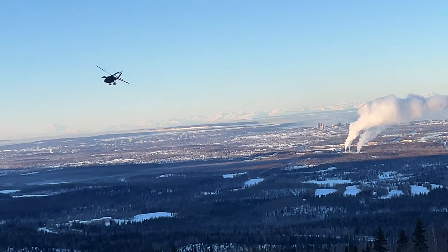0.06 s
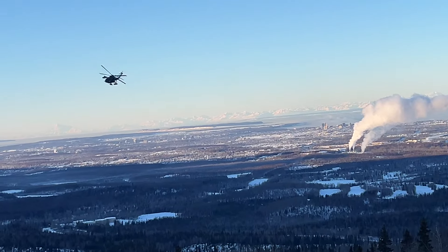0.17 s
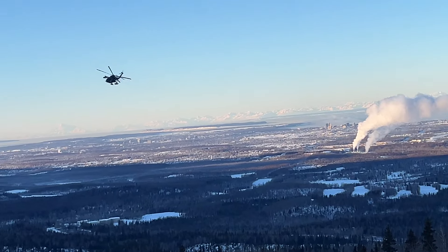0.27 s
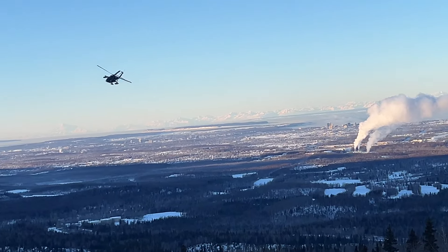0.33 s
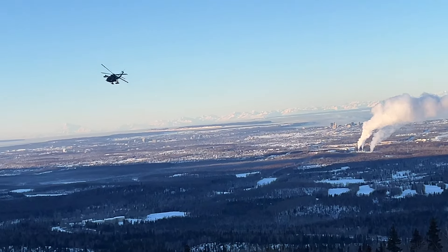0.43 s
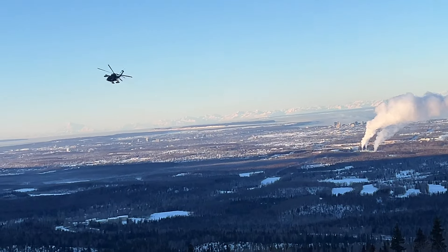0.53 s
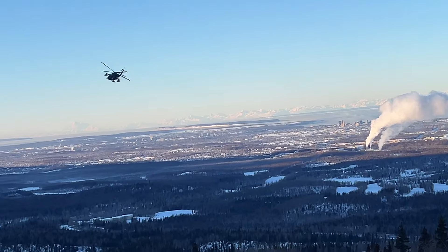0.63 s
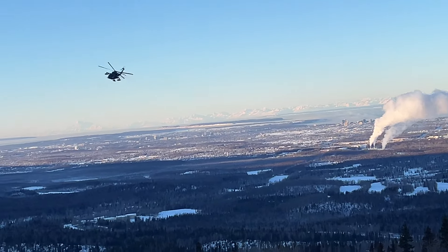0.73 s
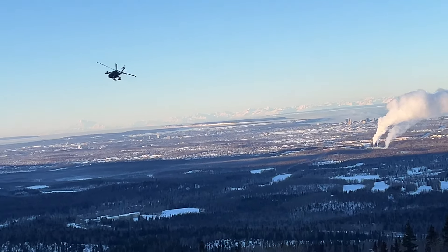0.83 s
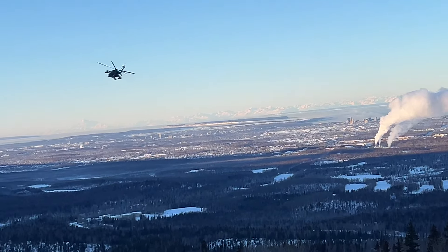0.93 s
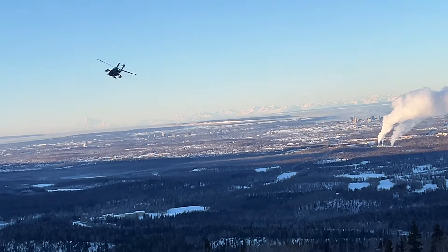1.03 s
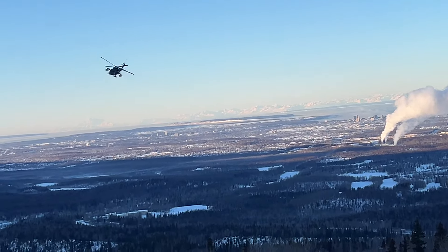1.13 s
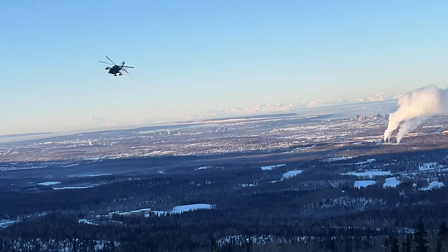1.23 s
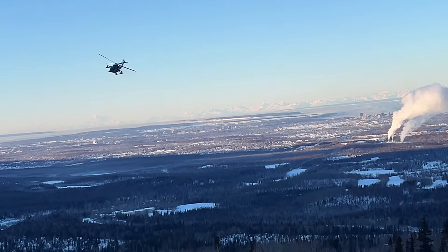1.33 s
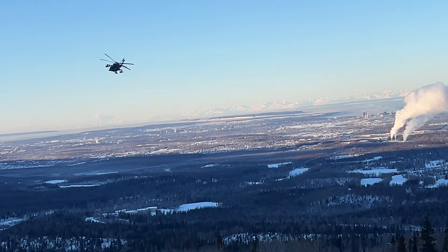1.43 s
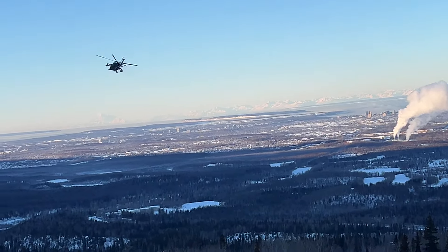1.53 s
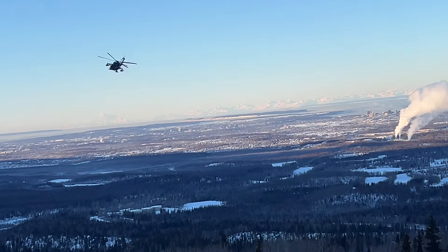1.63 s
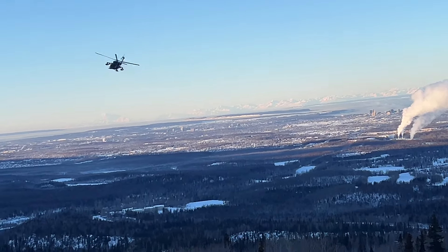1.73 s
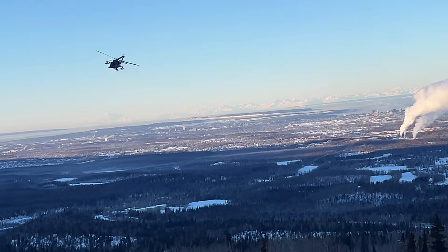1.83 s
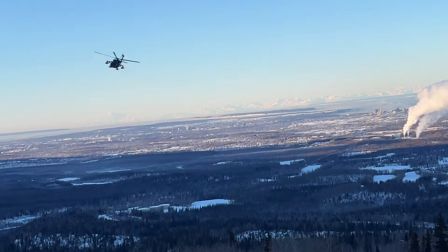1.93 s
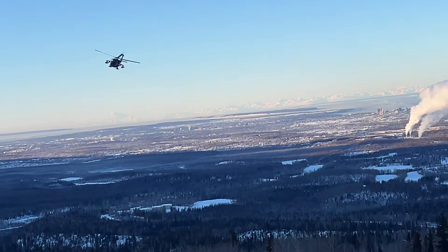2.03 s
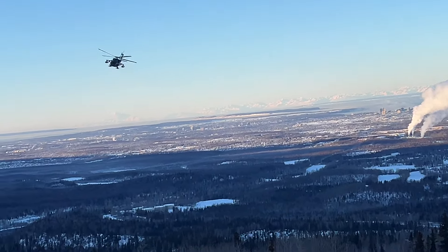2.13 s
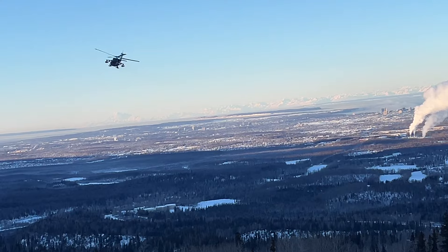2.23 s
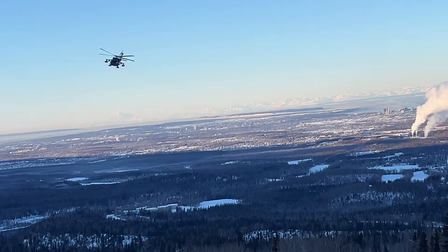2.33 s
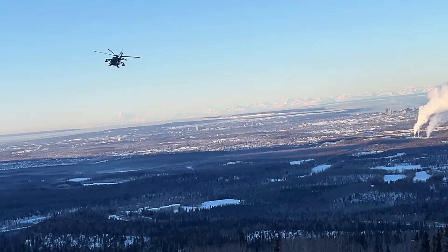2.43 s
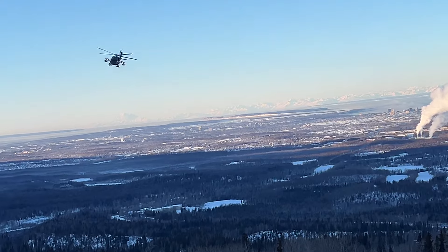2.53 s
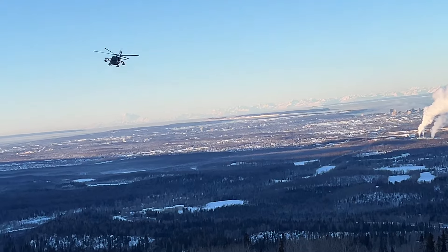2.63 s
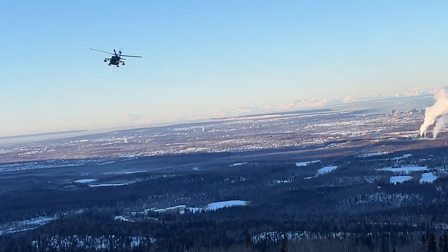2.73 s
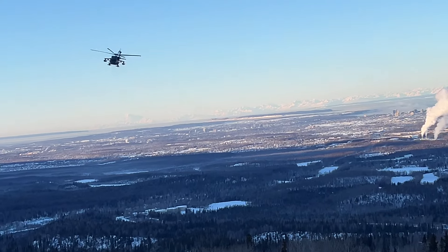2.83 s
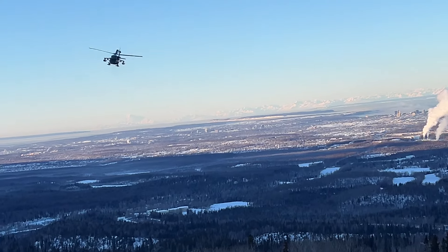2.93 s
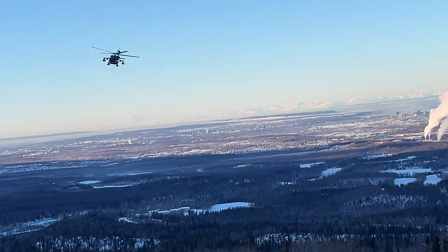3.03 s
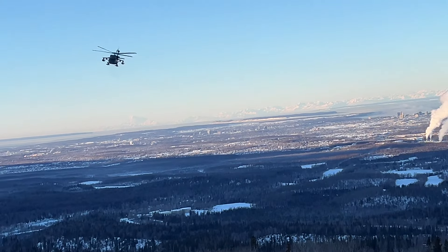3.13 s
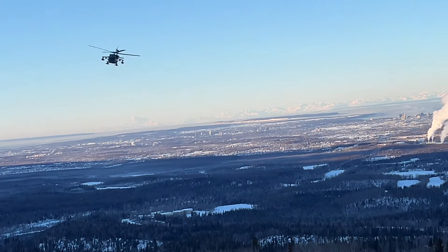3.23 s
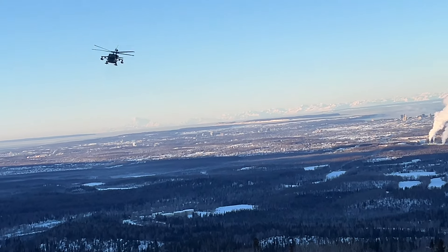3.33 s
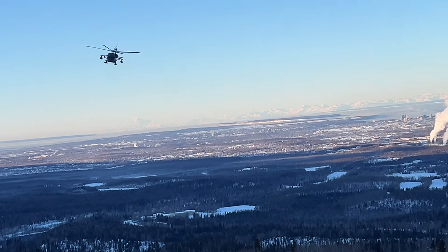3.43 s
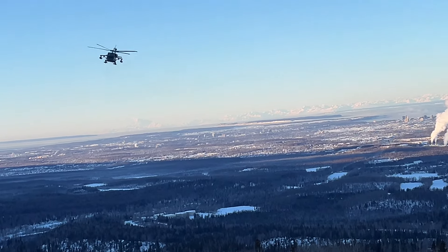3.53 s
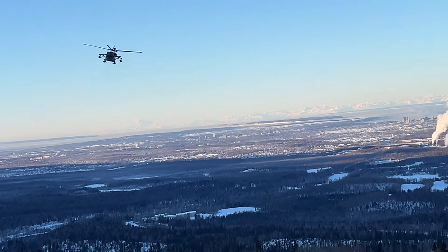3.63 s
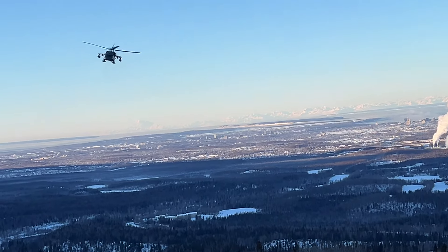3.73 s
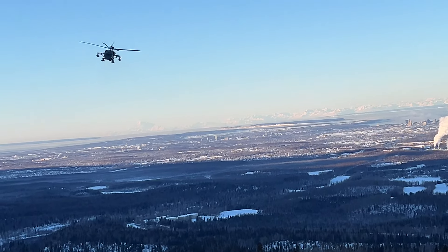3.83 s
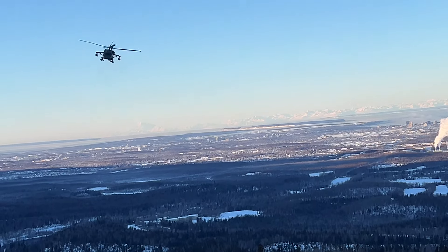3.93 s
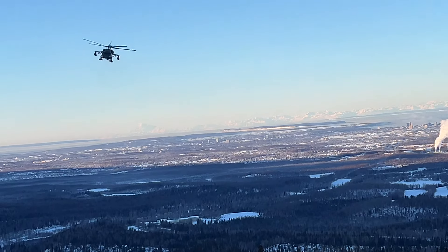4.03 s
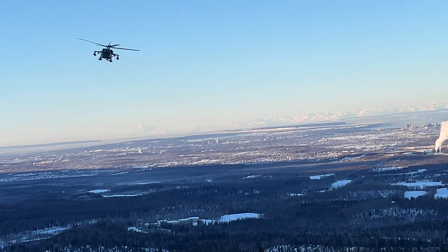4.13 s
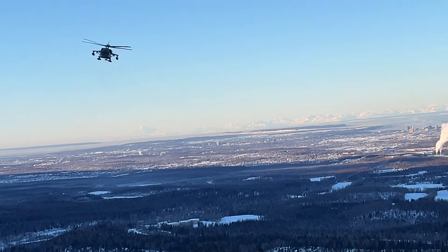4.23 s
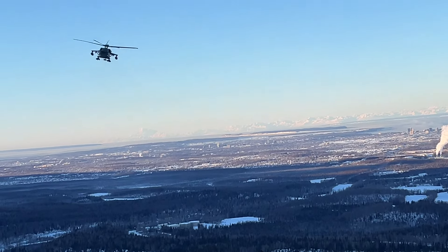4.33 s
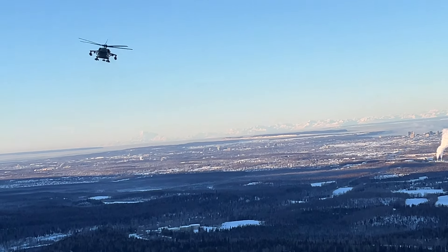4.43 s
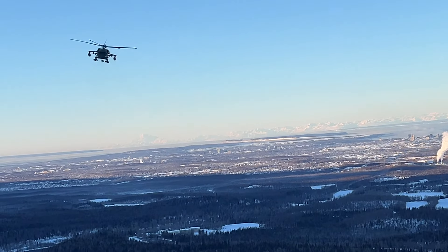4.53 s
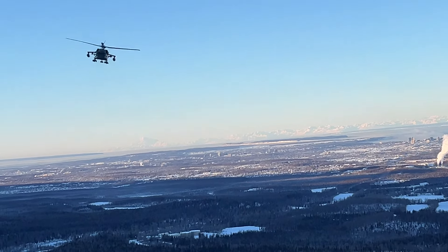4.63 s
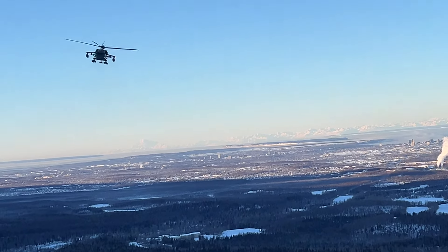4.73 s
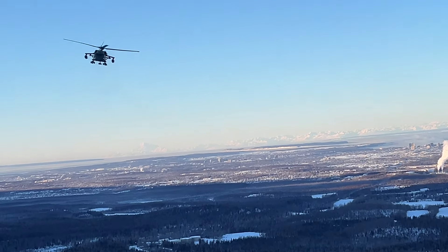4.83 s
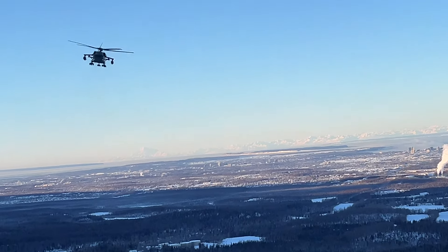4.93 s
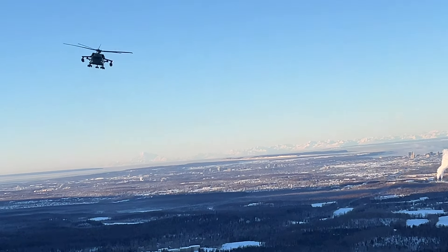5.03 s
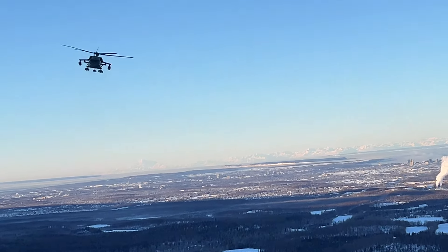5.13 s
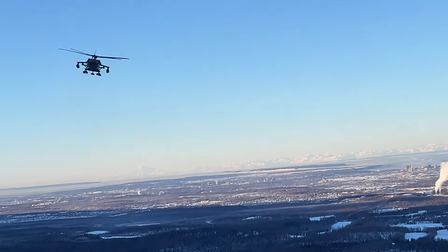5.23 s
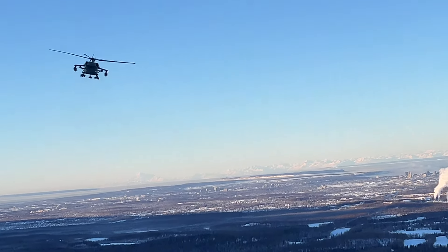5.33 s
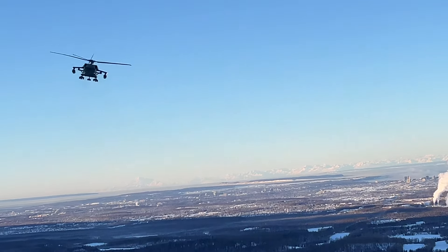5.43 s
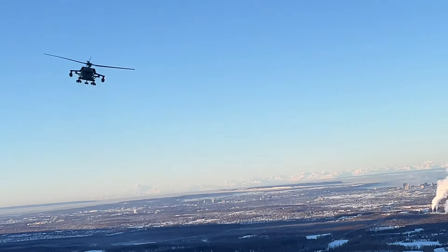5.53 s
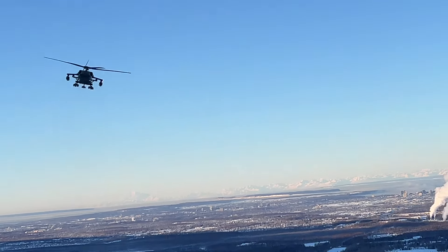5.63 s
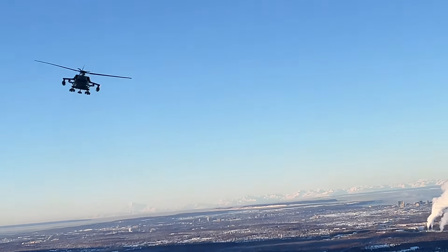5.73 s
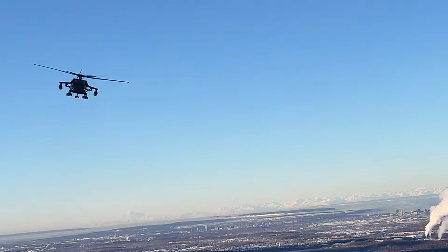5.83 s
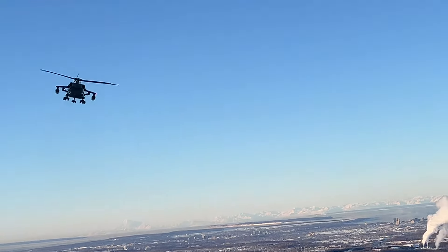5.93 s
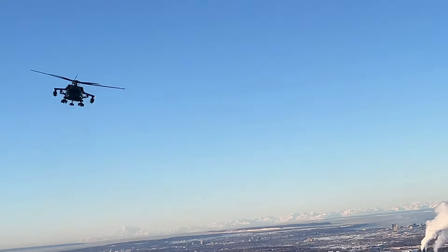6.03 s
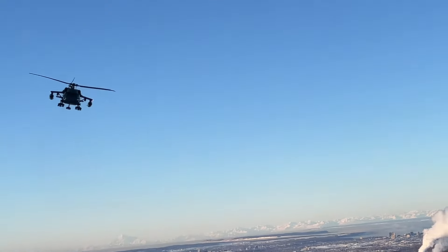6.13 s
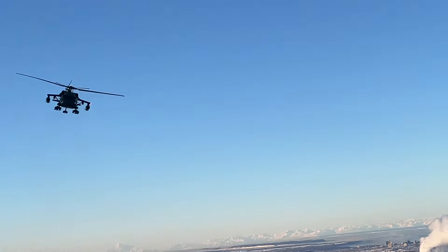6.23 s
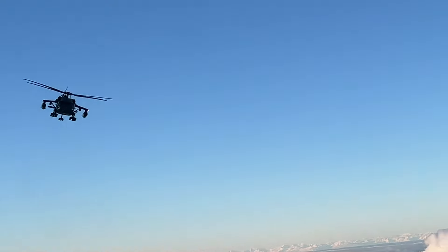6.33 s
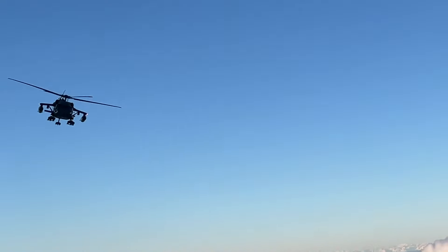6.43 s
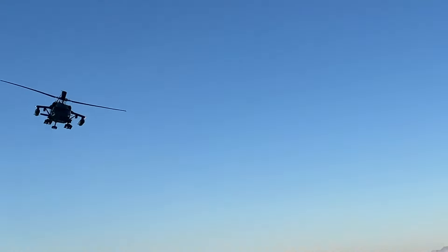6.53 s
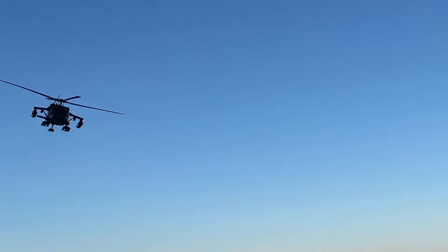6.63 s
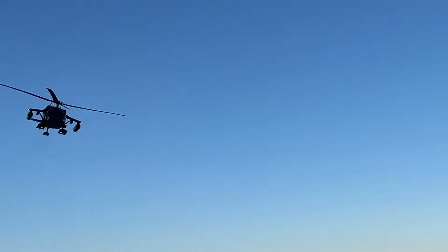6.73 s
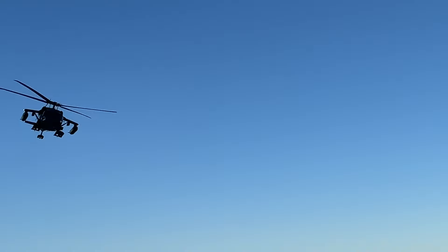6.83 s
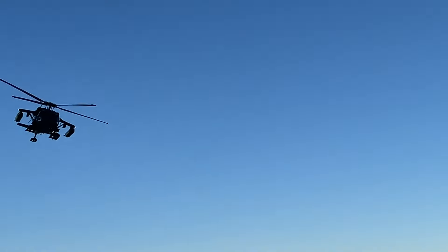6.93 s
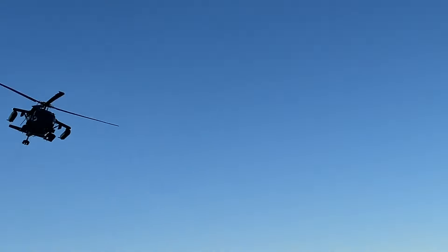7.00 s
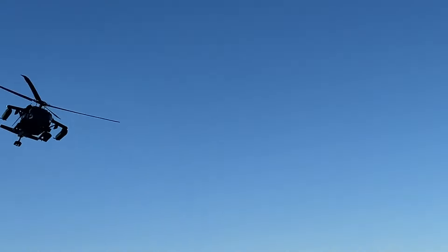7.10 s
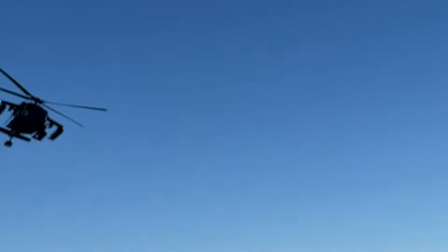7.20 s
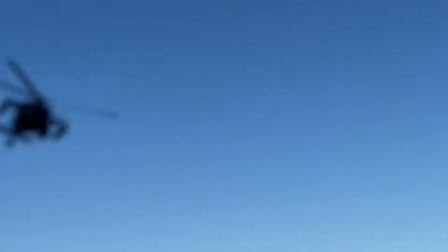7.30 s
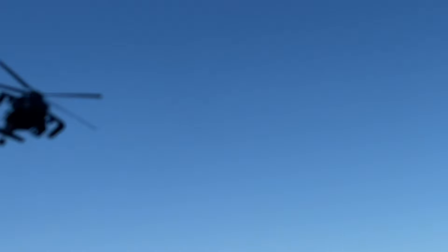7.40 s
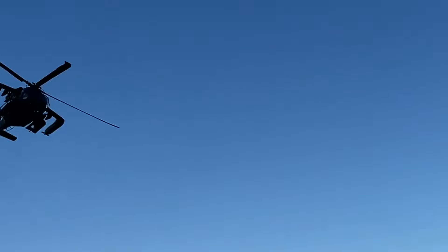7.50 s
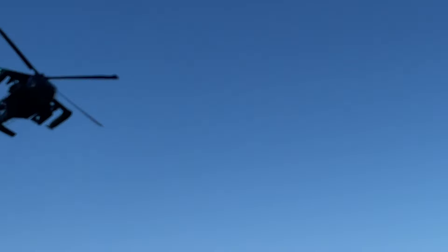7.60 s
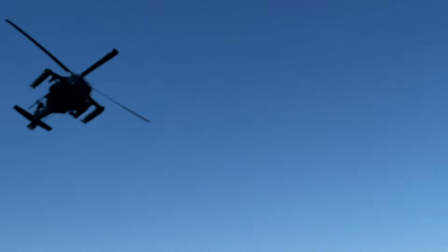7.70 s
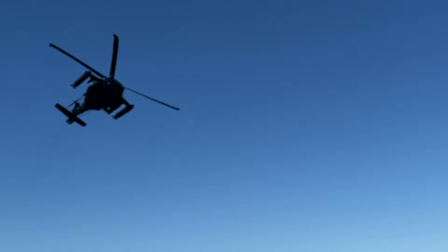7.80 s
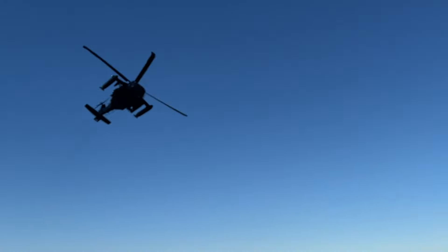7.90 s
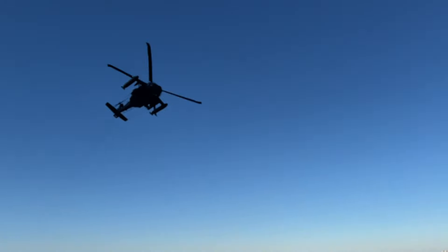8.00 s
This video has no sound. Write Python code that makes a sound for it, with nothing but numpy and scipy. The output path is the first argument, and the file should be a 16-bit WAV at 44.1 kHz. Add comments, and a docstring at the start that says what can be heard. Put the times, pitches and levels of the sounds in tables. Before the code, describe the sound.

A single helicopter approaches over open country for about eight seconds, with no echo. From the start, its distant tail rotor makes a throbbing, raspy buzz that wavers over a soft rush of air. Around 2 seconds a thin, high gear whine appears, followed by a few light blade slaps. By 3 seconds the main rotor's deep, fast thump takes over, about twenty beats a second, each with a swish, and the buzz fades back. A duller slap lands near 3.2 seconds and another near 6.1. The whine and a very high turbine tone swell and fade between 3 and 6 seconds. From 6 seconds, roaring air and pulsing hiss grow louder and a rounder drone rises. The helicopter passes close overhead at about 7.5 seconds, its pitch dipping slightly, with a rapid run of sharp, crackling slaps from 7.7 seconds to the end, still loud.

```python
"""Open snowy country: a helicopter approaches and passes close overhead.
Far off, the tail rotor's quick pressure pulses buzz; then the main rotor's chirped thump takes over,
each blade with a tip swish ahead of it. Turbulent wash, gear whine and turbine hiss swell as it nears.
Blades cutting tip vortices slap and crackle, mostly overhead."""
import sys
import numpy as np
from scipy import signal
from scipy.fft import rfft, irfft, next_fast_len
from scipy.io import wavfile
from scipy.ndimage import uniform_filter1d

SR = 44100
rng = np.random.default_rng(int(sys.argv[2]) if len(sys.argv) > 2 else 0)


def store_wav(level_fs):
    """Save 16-bit WAV to argv[1]."""
    pcm = np.round(np.clip(np.atleast_2d(level_fs), -1, 1) * 32767)
    wavfile.write(sys.argv[1], SR, pcm.T.astype(np.int16))


N = 355446
N_FFT = next_fast_len(N, True)
T_S = np.arange(N) / SR
F_HZ = np.maximum(np.fft.rfftfreq(N_FFT, 1 / SR), 1)
PASS_S, SPEED_M_PER_S, CLOSEST_M = 7.57, 71, 71.4  # straight, even flight
GEAR_RATIO, MAIN_LEAD_S = 4.607, .13  # tail passages per main passage; main rotor flies by earlier

# Main rotor, thrown forward as the nose swings to the listener: t/s, thump/dB, knock/dB
MAIN_LEVELS = [(0, -42, -32), (.9, -38.5, -30), (2, -26, -38.5), (3, -19.5, -24), (4.35, -17.5, -21),
               (5, -16.5, -18.5), (6.3, -14, -16), (7.3, -15.5, -14), (8.06, -18.5, -16)]
# Main rotor pulse spectrum: harmonic, level/dB
MAIN_SPECTRUM = [(1, -22), (2, -5), (3, 8), (4, 8.5), (5, 4.5), (7, 4), (8, 2.5), (10, -4), (13, -7.5),
                 (18, -13), (24, -24.5), (45, -45), (110, -38.5)]
# Main blade swish: t/s, level/dB
SWISH_LEVEL = [(0, -48), (.6, -48.5), (1.4, -38.5), (2, -43), (2.6, -47.5), (3.05, -36.5), (3.8, -43),
               (4.6, -35.5), (5.3, -43), (5.75, -35), (6.2, -35), (6.85, -25.5), (7.15, -30.5), (7.45, -29),
               (8.06, -23.5)]
# Single harder swishes: t/s, boost/dB
SWISH_ACCENTS = [(.886, 5), (1.04, 6), (2.961, 6), (3.162, 6), (3.51, 6), (3.56, 6), (6.39, 3), (6.887, 2),
                 (6.935, 2), (7.38, 4), (7.48, 4)]
# Blade-vortex hits: t/s, peak/dB, brightness/Hz
VORTEX_HITS = [(2.2100, -20, 900), (2.3185, -15, 1200), (2.4735, -22, 900), (2.5170, -22, 900),
               (3.2075, -10.5, 480), (6.1235, -8, 370), (7.1300, -15, 500), (7.1590, -12, 600),
               (7.7295, -15, 800), (7.7770, -9, 650), (7.8283, -5, 1150), (7.8792, -8, 700),
               (7.9295, -7.5, 650), (7.9808, -7.5, 3000), (8.0325, -14, 2500)]

# Tail rotor, loud in its disc plane (far off, again overhead): t/s, hum/dB, drone/dB, buzz/dB, rasp/dB
TAIL_LEVELS = [(0, -20.5, -37.5, -33, -28.5), (.45, -21.5, -34, -30, -31.5), (.7, -24, -31.5, -28.5, -33.5),
               (1.05, -24, -31, -30, -31.5), (1.5, -22.5, -29, -30.5, -41), (2.55, -26.5, -28.5, -30, -38),
               (3.6, -36, -33, -33.5, -44), (4.4, -59, -37, -41, -55), (5.6, -33, -41.5, -55, -46.5),
               (6.85, -29.5, -31, -51, -49), (7.3, -33, -28.5, -37, -36), (7.54, -28, -20.5, -33, -36.5),
               (7.76, -18.5, -25.5, -51, -46), (8.06, -20, -32, -46, -65)]
# Tail blade passage rate, Doppler included: t/s, f/Hz
TAIL_BLADE_RATE = [(0, 89.48), (1, 90.33), (1.9, 90.5), (2.6, 91.6), (3.5, 92.43), (6, 92.82), (6.5, 93.41),
                   (7, 93.4), (7.5, 92.55), (8.2, 90.8)]
# Four unequal tail blades, in passing order: offset/dB
TAIL_IMBALANCE = [2.6, -2.2, .1, -1.3]
# Tail throb: t/s, share of imbalance, swing from main rotor wake/dB
THROB_DEPTH = [(0, .6, .3), (.9, 1, 1.2), (1.6, 1, 2), (2.5, .7, 2), (3.4, .4, 1.4), (7, .3, 0)]
# Tail pulse spectrum from ahead: harmonic, level/dB
TAIL_AHEAD_SPECTRUM = [(1, -2.5), (2, 3), (3, 0), (4, -5), (5, -0.5), (6, -0.5), (7, -2), (9, -10),
                       (16, -11.5), (20, -17), (28, -48), (40, -49.5), (70, -61)]
# Tail pulse spectrum from below: harmonic, level/dB
TAIL_BELOW_SPECTRUM = [(1, 0.5), (2, 2), (3, 5), (4, -12), (5, -11), (6, -13), (7, -26), (9, -12),
                       (16, -13), (26, -37), (70, -50)]
# View of the tail rotor: t/s, share heard from below
BELOW_SHARE = [(0, 0), (4, 0), (6, .8), (7, 1), (8.06, 1)]
# Sharp top of the tail pulses, beamed in the disc plane: t/s, level/dB
CRACK_LEVEL = [(0, -31), (.09, -35), (.16, -43.5), (.42, -45), (.55, -55), (1.1, -53.5), (1.5, -53.5),
               (6.7, -57), (7.15, -38.5), (7.4, -39), (7.6, -35), (7.76, -39)]
# Spectrum of that top: harmonic, level/dB
CRACK_SPECTRUM = [(20, 7), (27, 11.5), (35, 9), (44, -2.5), (60, -2.5), (104, -11.5)]
# Stray paths through uneven air: lag/s, wander/s, level/dB
AIR_PATHS = [(.0007, .0002, -13.5), (.0028, .0004, -17.5)]

# Wash and hiss spectrum: f/Hz, density/dB
WASH_SPECTRUM = [(20, 40), (60, -4), (190, 2), (350, 8.5), (600, 6), (900, -3.5), (1500, -6.5),
                 (2000, -6.5), (2400, -8), (2900, -9), (4000, -18), (5200, -19.5), (6500, -17.5),
                 (8200, -20), (10000, -29.5), (12500, -30.5), (15000, -21.5)]
# Stereo width of wash and hiss: f/Hz, side minus mid/dB
WASH_WIDTH = [(60, -11), (250, -19.5), (600, -16.5), (1500, -16), (2400, -17.5), (3300, -12), (4500, -50),
              (8000, -56), (10500, -29), (15000, -23)]
# Far wash, lows: t/s, level/dB
FAR_RUMBLE_LEVEL = [(0, -30.5), (2, -31), (3.2, -29), (5, -31), (6.5, -21.5)]
# Far wash, midrange: t/s, level/dB
FAR_RUSH_LEVEL = [(0, -32.5), (1, -33), (1.6, -36), (2.6, -33.5), (3.6, -32.5), (4.6, -36), (6.6, -38)]
# Treble, swelling and fading through the air: t/s, level/dB
HISS_LEVEL = [(0, -59), (.85, -49.5), (1.5, -57), (1.95, -49), (2.8, -46.5), (3.15, -50), (3.4, -39.5),
              (3.65, -49.5), (4.25, -50), (4.6, -42.5), (4.8, -47), (5.55, -46), (6.25, -44), (6.77, -40),
              (7.1, -36.5), (7.4, -35.5), (7.56, -36), (8.0, -30.5)]
# Hiss surge per blade, under the disc: t/s, swing/dB
HISS_SURGE = [(7.1, 0), (7.45, 2), (8.06, 2.4)]

# Gear tones from ahead: f/Hz, level/dB, width/Hz
NOSE_GEARS = [(3020, -73, 44), (3920, -68, 18), (5470, -65, 40), (6300, -74.5, 40), (7031, -67, 34),
              (8600, -62.5, 75), (9390, -66, 70)]
# Gear tones from below: f/Hz, level/dB
BELLY_GEARS = [(1577, -47), (2320, -49), (2972, -53.5)]
# Whine beamed forward: t/s, nose gears/dB, intake/dB
WHINE_LEVELS = [(0, -11, -53), (1.5, -9, -65.5), (2, 5, -55.5), (3.15, 3, -47), (3.4, 10, -51),
                (3.7, 3.5, -50.5), (4.8, 9, -68), (5.15, 8.5, -59), (5.42, 12, -45.5), (5.72, 7, -43.5),
                (5.95, 1, -52), (7.1, -8, -60)]
# Turbine compressor pitch: t/s, f/Hz
COMPRESSOR_PITCH = [(0, 15100), (1, 15150), (2.5, 15520), (4.5, 15640), (6, 15580), (6.6, 15420),
                    (7, 15280), (8.06, 15300)]
# Compressor beam sweeping past: t/s, top hiss/dB, compressor/dB
BEAM_LEVELS = [(0, -52, -62), (.5, -68, -68), (1.6, -73, -61), (1.9, -63, -56), (2.6, -54, -65),
               (2.78, -47.5, -49), (3.35, -50, -47), (3.7, -48.5, -46), (4.25, -46, -46), (4.57, -44, -31),
               (4.75, -47.5, -41), (5.6, -42, -38), (6.25, -42.5, -40), (6.5, -41, -38), (6.75, -31, -25),
               (7.12, -38, -30), (7.33, -26, -27.5), (7.58, -35.5, -38), (7.75, -29, -31), (8.06, -28, -50)]

# Left-right balance: f/Hz, left minus right/dB
STEREO_BALANCE = [(60, -.2), (380, -.4), (700, .3), (1290, 1), (2380, .1), (4400, .7), (8000, 0)]
# Left-right phase; the left ear lags in the top treble, widening the hiss: f/Hz, left lead/rad
STEREO_PHASE = [(0, 0), (2000, 0), (3150, .55), (4300, .15), (8500, 0), (9100, -1.57), (10230, -3.14),
                (11300, -4.71), (12050, -6.28), (15550, -12.57)]


def main_rotor(passages, rate_hz):
    """One pressure pulse per blade: steady thump and knock, less steady edge and snap."""
    thump_db, knock_db = curves(MAIN_LEVELS)
    thump, knock, edge, snap = (pulse_train(passages, rate_hz, MAIN_SPECTRUM, range(*span), thump_rad)
                                for span in [(1, 6), (6, 12), (12, 25), (25, 110)])
    body = (from_db(thump_db) * thump + from_db(knock_db) * knock) * per_blade(passages, spread_db=.5)
    edge = from_db(swell_db(-23, growth=.99)) * edge
    snap = from_db(swell_db(-36.5, growth=.92)) * snap * per_blade(passages, spread_db=2)
    return body + (edge + snap) * per_blade(passages, spread_db=2)


def chirp_rad(hz, lag_cycles=1.495, pivot_hz=101.7):
    """Falling chirp: every frequency lags by the same number of cycles."""
    return -2 * np.pi * lag_cycles * np.log(hz / pivot_hz)


def thump_rad(hz, centre_hz=130):
    """Main rotor chirp; its deepest part lags less."""
    return chirp_rad(hz) + .6 - 1.4 * np.log(np.minimum(hz, 2 * centre_hz) / centre_hz) ** 2


def blade_swish(passages):
    """Hiss burst from each advancing tip, wandering between dull and bright."""
    swish_db, = curves(SWISH_LEVEL)
    swish_db += sum(db * np.exp(-((T_S - at_s) / .02) ** 2) for at_s, db in SWISH_ACCENTS)
    tilt_db = 2.5 * drift(2)
    dull = from_db(-2.5 - tilt_db) * air_noise(2340, 3070)
    bright = from_db(-5 + tilt_db) * air_noise(3080, 4470)
    return from_db(swish_db) * swish_gate(passages) * (dull + bright)


def swish_gate(passages):
    """Quick rise, slower fall, once per main blade."""
    return blade_gate(passages, crest=.065, rise=.035, fall=.08) * per_blade(passages, spread_db=1.1)


def vortex_slaps(body_hz=220, burst_db=-11, decay_s=.0028):
    """Blade cuts a tip vortex: chirped pulse plus a short burst of torn air."""
    out = np.zeros(N)
    chirp = highpass(body_hz, order=2) * np.exp(1j * chirp_rad(F_HZ))
    for at_s, peak_db, bright_hz in VORTEX_HITS:
        age_s = np.maximum(T_S - at_s, 0)
        envelope = (age_s > 0) * np.exp(-np.minimum(age_s / decay_s, 20))
        source = from_db(burst_db) * rng.standard_normal(N) * envelope
        source[round(at_s * SR)] += 4
        colour = lowpass(bright_hz, order=2) * lowpass(4 * bright_hz, order=2)
        pulse = filtered(source, colour * chirp)
        out += from_db(peak_db) * pulse / np.abs(pulse).max()
    return out


def tail_rotor(passages, rate_hz, main_passages):
    """Quick, sharp, unequal pulses, shaken by the air; a rounder drone from below."""
    hum_db, drone_db, buzz_db, rasp_db = curves(TAIL_LEVELS)
    below, = curves(BELOW_SHARE)
    crack_db, = curves(CRACK_LEVEL)
    load_db = tail_load_db(passages, main_passages)
    passages = passages + .009 * (1 - .85 * below) * drift(14)  # timing jitter from uneven air
    hum, drone, buzz, rasp = (
        (1 - below) * pulse_train(passages, rate_hz, TAIL_AHEAD_SPECTRUM, range(*span))
        + below * pulse_train(passages, rate_hz, TAIL_BELOW_SPECTRUM, range(*span))
        for span in [(1, 4), (4, 6), (6, 9), (9, 26)])
    crack, tick = (pulse_train(passages, rate_hz, CRACK_SPECTRUM, range(*span))
                   for span in [(21, 45), (45, 105)])
    low = from_db(swell_db(-17, growth=1.78, far_db=hum_db) - 2.5) * hum
    middle = from_db(drone_db) * drone + from_db(buzz_db) * buzz
    middle *= from_db(.6 * load_db + 1.6 * (1 - below) * drift(12))
    top = from_db(rasp_db + 3) * rasp + from_db(crack_db) * crack
    top += from_db(27.5 + 2.055 * crack_db) * tick
    top *= from_db(load_db) * per_blade(passages, spread_db=1.4)
    return through_air(low + middle + top)


def tail_load_db(passages, main_passages, wake_passage=.16):
    """Tail blades differ in strength; all hit harder in a main blade's wake."""
    share, wake_db = curves(THROB_DEPTH)
    blades = len(TAIL_IMBALANCE)
    own_db = np.interp(passages - .15, np.arange(blades), TAIL_IMBALANCE, period=blades)
    return share * own_db + wake_db * np.cos(2 * np.pi * (main_passages - wake_passage))


def through_air(x):
    """Stray delayed copies come and go, so the far timbre wavers."""
    farness = np.sqrt(np.maximum(1 - CLOSEST_M / distance_m(), 0))
    strays = sum(from_db(db) * drift(9) * np.interp(T_S - lag_s - wander_s * drift(3), T_S, x)
                 for lag_s, wander_s, db in AIR_PATHS)
    return x + farness * strays


def turbulence(main_passages, tail_passages):
    """Wash and hiss chopped by both rotors; the close wash overtakes a far bed."""
    far_rumble_db, = curves(FAR_RUMBLE_LEVEL)
    far_rush_db, = curves(FAR_RUSH_LEVEL)
    far_roar_db = -27.5 + .84 * (far_rush_db - far_rush_db[0])
    rumble_db = swell_db(-21.5, growth=10, far_db=far_rumble_db)
    roar_db = swell_db(-23.5, growth=1.86, far_db=far_roar_db)
    rush_db = swell_db(-32, growth=2.4, far_db=far_rush_db)
    hiss_db, = curves(HISS_LEVEL)
    top_db, _ = curves(BEAM_LEVELS)
    *_, rasp_db = curves(TAIL_LEVELS)
    surge_db = curves(HISS_SURGE)[0] * np.cos(2 * np.pi * (main_passages - .03))
    main_gate = swish_gate(main_passages)
    sharpness = .14 + from_db(rasp_db - rush_db)  # sharp tail pulses chop hardest
    tail_gate = sharpness * blade_gate(tail_passages, crest=.12, rise=.09, fall=.09)
    tail_gate *= from_db(tail_load_db(tail_passages, main_passages))
    tail_gate *= per_blade(tail_passages, spread_db=2.2)

    def band(level_db, low_hz, high_hz, swish, chop, flutter_db):
        """Noise band; swish and chop are main and tail modulation depths."""
        pulsing = (1 + swish * main_gate + chop * tail_gate) * from_db(flutter_db * drift(6.5))
        pulsing /= np.sqrt(uniform_filter1d(pulsing ** 2, size=SR // 2))
        return from_db(level_db) * pulsing * air_noise(low_hz, high_hz)

    return (band(rumble_db - .6, 46, 233.6, swish=.2, chop=.044, flutter_db=1)
            + band(roar_db - 1.76, 277, 860, swish=1.08, chop=.13, flutter_db=.84)
            + band(rush_db - .67 * sharpness, 792, 1676, swish=.31, chop=1, flutter_db=.6)
            + band(hiss_db - 1.5, 1770, 5100, swish=.27, chop=.63, flutter_db=1)
            + band(hiss_db + surge_db - .6, 3660, 12000, swish=.81, chop=1, flutter_db=1.75)
            + band(top_db + surge_db, 10400, 11030, swish=.83, chop=.05, flutter_db=3.5))


def gearbox(doppler):
    """Gear tones bend with rotor pitch: nose set beamed forward, belly set swelling with nearness."""
    nose_db, _ = curves(WHINE_LEVELS)
    nose = sum(from_db(db) * wavering_tone(hz * doppler ** .4, width_hz) * from_db(1.3 * drift(3))
               for hz, db, width_hz in NOSE_GEARS)
    belly = sum(from_db(db) * wavering_tone(hz * doppler, width_hz=35) for hz, db in BELLY_GEARS)
    return from_db(nose_db) * nose + from_db(swell_db(9, growth=2.1)) * belly


def turbine(doppler, intake_hz=3015):
    """The compressor sings at the very top; the intakes whine and rush with air."""
    pitch_hz, = curves(COMPRESSOR_PITCH)
    _, compressor_db = curves(BEAM_LEVELS)
    _, intake_db = curves(WHINE_LEVELS)
    compressor_db += 2.2 * drift(10)
    mid, side = (wavering_tone(pitch_hz, width_hz=210) for _ in range(2))
    compressor = mid + from_db(-17) * side * [[1], [-1]]
    intake = wavering_tone(intake_hz * doppler, width_hz=105) + air_noise(2770, 5300)
    return from_db(compressor_db) * compressor + from_db(intake_db) * intake


def air_noise(low_hz, high_hz):
    """Turbulence band, nearly alike left and right; rms 1."""
    colour = gain_at(WASH_SPECTRUM, F_HZ) * highpass(low_hz, order=6) * lowpass(high_hz, order=6)
    mid = filtered(rng.standard_normal(N), colour)
    side = filtered(rng.standard_normal(N), colour * gain_at(WASH_WIDTH, F_HZ))
    return unit_rms(mid + side * [[1], [-1]])


def wavering_tone(hz, width_hz):
    """Tone spread into a narrow band by turbulence; rms 1."""
    smoothing = signal.butter(2, width_hz, fs=SR, output="sos")
    in_phase, quadrature = signal.sosfilt(smoothing, rng.standard_normal((2, N)))
    angle_rad = 2 * np.pi * np.cumsum(hz) / SR
    return unit_rms(in_phase * np.cos(angle_rad) + quadrature * np.sin(angle_rad))


def pulse_train(passages, rate_hz, spectrum, harmonics, phase_rad=chirp_rad):
    """Harmonics of a rotor's pressure pulse, repeated each passage; rms 1."""
    cycle = np.linspace(0, 1, 2049)
    median_hz = np.median(rate_hz)
    pulse = sum(gain_at(spectrum, k) * np.cos(2 * np.pi * k * cycle + phase_rad(k * median_hz))
                for k in harmonics)
    return np.interp(passages % 1, cycle, unit_rms(pulse))


def blade_gate(passages, crest, rise, fall):
    """One bump per blade; all arguments in passages."""
    age = (passages - crest + .5) % 1 - .5
    return np.exp(-.5 * (age / np.where(age < 0, rise, fall)) ** 2)


def per_blade(passages, spread_db):
    """Random gain per passage, interpolated."""
    gains = unit_rms(from_db(spread_db * rng.standard_normal(1024)))
    return np.interp(passages, np.arange(len(gains)), gains)


def distance_m():
    """Range to the helicopter, per sample."""
    return np.hypot(CLOSEST_M, SPEED_M_PER_S * (T_S - PASS_S))


def swell_db(closest_db, growth, far_db=-120):
    """Near level (gain ~ 1 / range ** growth), power-summed with a far level."""
    near_db = closest_db + growth * 20 * np.log10(CLOSEST_M / distance_m())
    return 10 * np.log10(from_db(near_db) ** 2 + from_db(far_db) ** 2)


def drift(rate_hz):
    """Slow random wander; rms 1."""
    hop, warmup = 40, 2000
    noise = rng.standard_normal(N // hop + warmup + 2)
    pole = np.exp(-2 * np.pi * rate_hz * hop / SR)
    slow = signal.lfilter([1], [1, -2 * pole, pole * pole], noise)[warmup:]
    return np.interp(np.arange(N) / hop, np.arange(len(slow)), unit_rms(slow))


def curves(table):
    """Columns of a time table, per sample."""
    times_s, *columns = np.transpose(table)
    return [np.interp(T_S, times_s, column) for column in columns]


def gain_at(spectrum, where):
    """Gain of a dB spectrum, interpolated on a log axis."""
    axis, db = np.transpose(spectrum)
    return from_db(np.interp(np.log(where), np.log(axis), db))


def filtered(x, response):
    """Apply a response given on F_HZ."""
    return irfft(rfft(x, N_FFT) * response, N_FFT)[..., :N]


def lowpass(edge_hz, order):
    """Low-pass magnitude."""
    return 1 / np.sqrt(1 + (F_HZ / edge_hz) ** (2 * order))


def highpass(edge_hz, order):
    """High-pass magnitude."""
    return 1 / np.sqrt(1 + (edge_hz / F_HZ) ** (2 * order))


def from_db(db):
    """dB to gain."""
    return 10 ** (np.asarray(db) / 20)


def unit_rms(x):
    """Scale to rms 1."""
    return x / np.sqrt(np.mean(x ** 2) + 1e-20)


def scene():
    """Two geared rotors; wash, gears and intake keep step with them."""
    tail_hz, = curves(TAIL_BLADE_RATE)
    main_hz = np.interp(T_S + MAIN_LEAD_S, *np.transpose(TAIL_BLADE_RATE)) / GEAR_RATIO
    main_passages = .8145 + np.cumsum(main_hz) / SR
    tail_passages = .602 + np.cumsum(tail_hz) / SR
    doppler = tail_hz / np.interp(5, T_S, tail_hz)  # 1 at 5 s
    rotors = main_rotor(main_passages, main_hz) + blade_swish(main_passages)
    rotors += tail_rotor(tail_passages, tail_hz, main_passages) + vortex_slaps()
    return rotors + turbulence(main_passages, tail_passages) + gearbox(doppler) + turbine(doppler)


def record(dry, cutoff_hz=15740):
    """Left and right differ in level and phase; peaks rounded, top cut."""
    lead_rad = np.interp(F_HZ, *np.transpose(STEREO_PHASE))
    lean = np.sqrt(gain_at(STEREO_BALANCE, F_HZ))
    skewed = filtered(dry, np.array([lean * np.exp(1j * lead_rad), 1 / lean]))
    rounded = skewed / (1 + np.abs(skewed) ** 8) ** (1 / 8)
    return filtered(rounded, lowpass(cutoff_hz, order=300))


dry = scene()
out = record(dry)
store_wav(out)
```